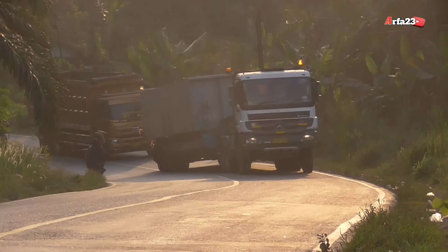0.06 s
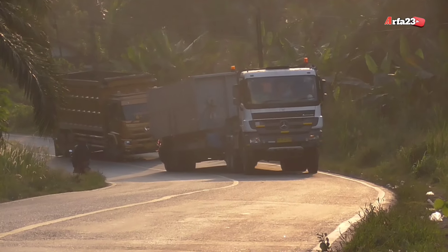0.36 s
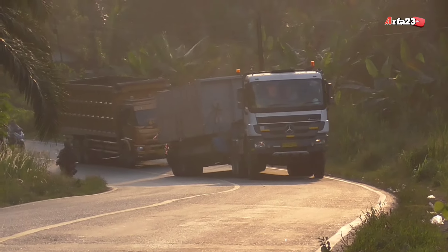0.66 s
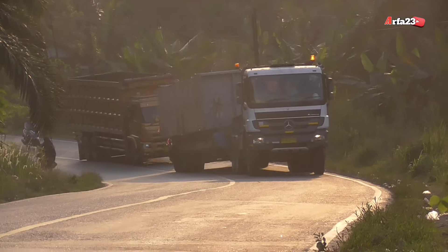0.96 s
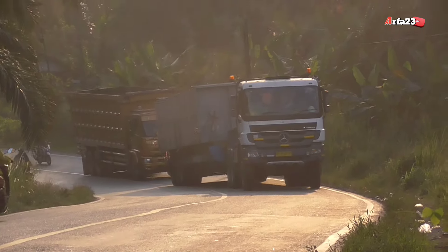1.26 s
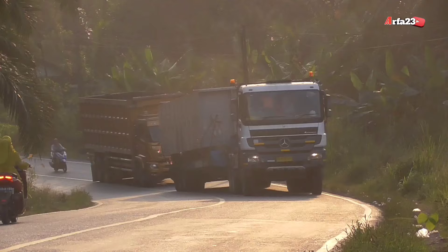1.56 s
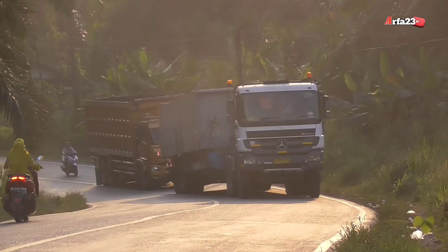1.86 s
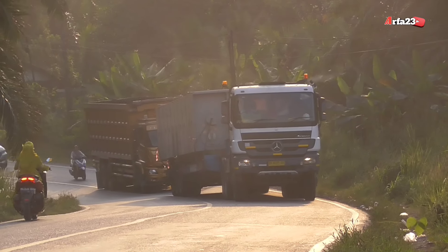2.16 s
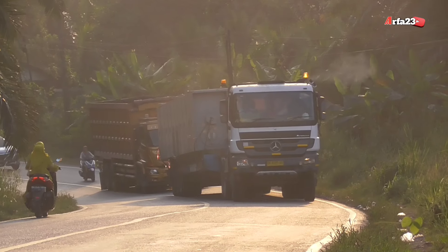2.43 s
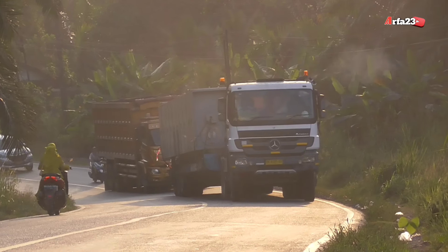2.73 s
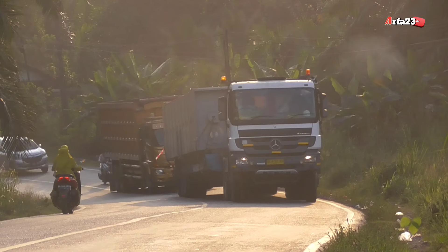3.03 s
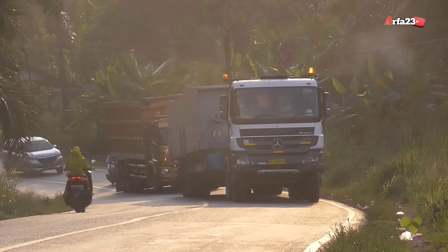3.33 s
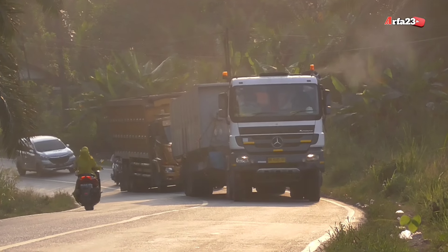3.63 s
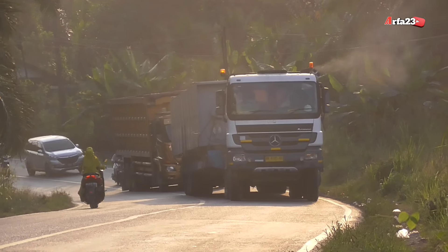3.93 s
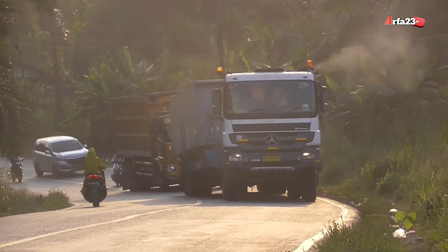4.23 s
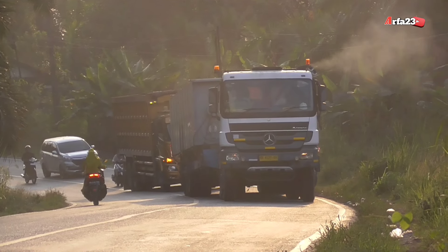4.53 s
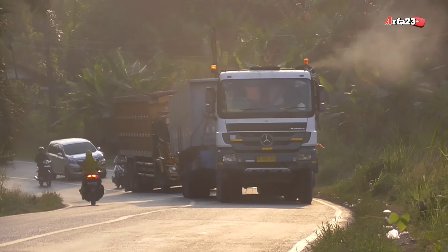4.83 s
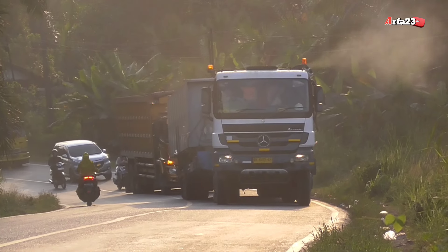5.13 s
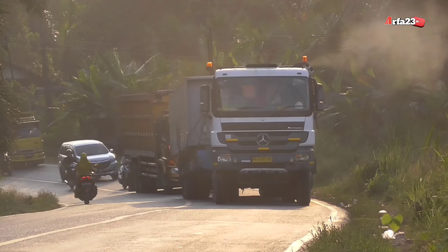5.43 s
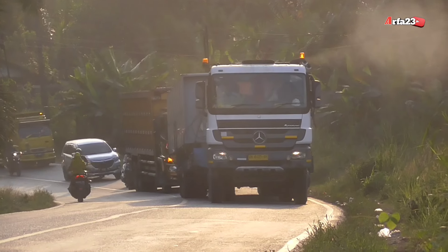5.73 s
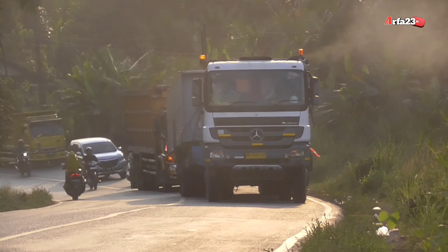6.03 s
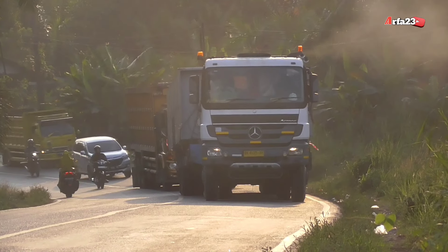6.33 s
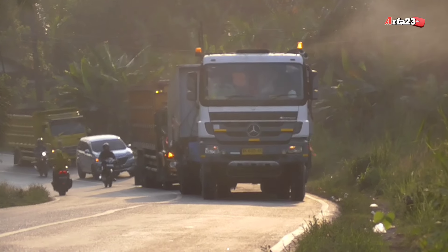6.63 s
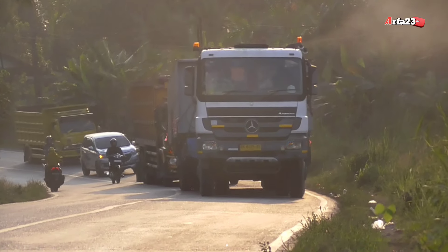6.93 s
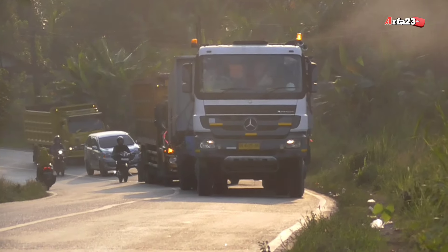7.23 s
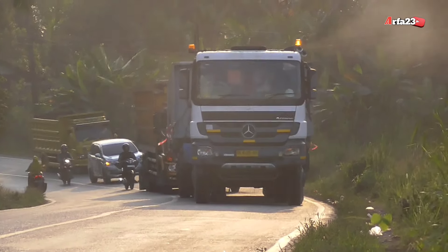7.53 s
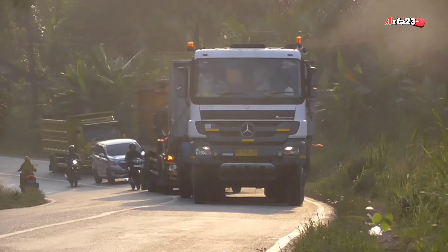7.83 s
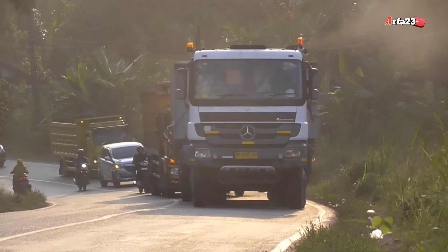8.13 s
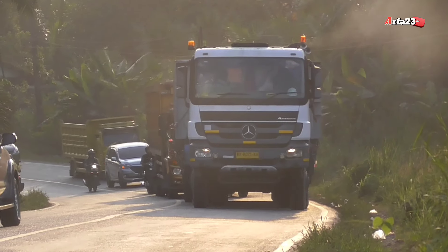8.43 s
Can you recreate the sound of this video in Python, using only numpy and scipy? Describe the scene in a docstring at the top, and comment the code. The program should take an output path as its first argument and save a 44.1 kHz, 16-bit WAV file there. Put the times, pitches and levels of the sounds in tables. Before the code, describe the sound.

A scooter putters away from close by, then traffic rolls past in swells of tyre roar while a heavy diesel truck drones nearer.

```python
"""Traffic on a bend of a country road, heard from the verge.
A single-cylinder scooter putters away from close by, each firing thumping its exhaust, its drive
hissing and ringing. As it fades, a truck lets off a puff of air. Vehicles then roll past in two
swells of tyre roar, body rumble and engine hum, with knocks of loose metal and flicked stones.
Under the second swell the heavy diesel truck drones nearer, its brakes squealing faintly."""
import sys
import numpy as np
from scipy import signal
from scipy.fft import rfft, irfft
from scipy.io import wavfile
from scipy.ndimage import uniform_filter1d

SR = 44100
rng = np.random.default_rng(int(sys.argv[2]) if len(sys.argv) > 2 else 0)


def transcribe(signal):
    """Save signal, clipped to [-1, 1], as a 16-bit WAV file at the path in sys.argv[1]."""
    frames = np.atleast_2d(signal).T
    limited = np.clip(frames, -1, 1)
    pcm = np.round(limited * 32767).astype(np.int16)
    wavfile.write(sys.argv[1], SR, pcm)


N = 383229
T = np.arange(N) / SR
HZ = np.fft.rfftfreq(N, 1 / SR)

# stereo image: how alike the two microphones sound (frequency [Hz], coherence [0-1])
MIC_LIKENESS = [(60, .98), (200, .99), (400, .98), (700, .95), (1300, .87), (2700, .66), (5500, .42),
                (9000, .42), (14000, .42)]
# their balance (frequency [Hz], left minus right [dB])
MIC_BALANCE = [(60, 2.5), (110, -0.2), (200, 0.6), (380, 0.2), (700, 1), (1290, 3.5), (2380, 4),
               (4400, 3.5), (8120, 3.5), (15000, -3)]
# their phase offset (frequency [Hz], left's lead [rad])
MIC_LEAD = [(10, 0), (90, .1), (180, .2), (350, .42), (750, .78), (1400, .75), (2300, 1.05), (4600, 1.25),
            (6500, 1.9), (8500, 2.6), (10000, 4.2), (12500, 4.4), (15200, 6)]

# pass-bys (closest at [s], time to half power [s], rumble [dB], roar [dB], brightness [dB/octave],
# ground-echo notch depth [dB], left minus right [dB], body boom [Hz], notch [Hz])
PASS_BYS = [(0.278, 0.17, -31, -25, 0, 6.5, 0, 230, 473), (.76, 0.17, -38, -34, 27, -14, 22, 380, 486),
            (3.7, 0.44, -27.5, -27, -8.5, -1, -7.5, 302, 560),
            (5.03, 0.37, -21, -17.5, -1.5, -9.5, 6.5, 367, 488),
            (5.95, 0.49, -27.5, -19, -5, 10, -2, 230, 504), (7.03, 0.52, -21, -21.5, 2.5, -14, 6, 272, 472),
            (7.8, 0.63, -25, -24, -4, 14, -3, 192, 460)]
# the dull bed of distant traffic behind them
FAR_ROAR_DB, FAR_BRIGHT_DB_PER_OCTAVE, FAR_SIDE_DB = -44, -43, -23
FAR_NOTCH_DB, FAR_NOTCH_HZ, FAR_BOOM_HZ = -6, 490, 200
# surges of thin, high hiss (start [s], end [s], level [dB], peak [Hz], peak height [dB])
HISS_SURGES = [(1.5, 1.63, -57, 12400, 15), (1.88, 2.0, -61, 12400, 7), (3.13, 3.55, -60.5, 12000, 2),
               (4.08, 4.43, -52, 11800, 0), (4.62, 5.035, -54, 5100, 17), (5.28, 5.816, -54.5, 7260, 15),
               (6.24, 6.417, -54, 13500, 4), (7.05, 7.504, -49.5, 7400, 4), (8.42, 8.69, -54, 11800, 5)]
# their colour (frequency [Hz], level [dB])
SURGE_EQ = [(3000, -19), (4800, 1), (6500, -4.5), (9000, -2), (12200, -2), (15500, -14)]
# rumble of bodies and tyre carcasses (frequency [Hz], level [dB])
RUMBLE_EQ = [(15, -69), (25, -51), (46, -75), (70, -13.5), (97, -9.5), (120, -2.5), (148, 3), (183, -0.5),
             (210, 0.5), (252, -2.5), (311, -1), (480, -19.5), (620, -23), (1060, -120)]
# hiss of grit and air in the treads (time [s], level before trim [dB])
GRIT_LEVEL = [(1.8, -56.5), (3.8, -52.5), (4.35, -45.5), (5.5, -45), (6.5, -45), (7.3, -41.5), (8.69, -45)]
# its colour (frequency [Hz], level [dB])
GRIT_EQ = [(1290, -11), (2200, -4.5), (3030, -8.5), (3960, -5.5), (5000, -9), (6150, -13.5), (7300, -11),
           (9040, -8), (13300, -16), (14600, -23), (15500, -23)]
# flicked stones (time [s], peak level [dB], band centre [Hz])
STONE_TICKS = [(4.6685, -36, 7500), (6.036, -34.5, 6500), (6.4301, -33, 3500)]
# tread roar (frequency [Hz], level [dB])
ROAR_EQ = [(220, -22), (380, -2), (449, -5.5), (862, -1.5), (1070, -6.5), (1300, -8), (1770, -23),
           (2800, -35.5), (3640, -34), (6160, -120)]
# howls in the roar (start [s], end [s], start pitch [Hz], end pitch [Hz], boost [dB], width [octaves])
TREAD_HOWLS = [(.15, 0.383, 664, 700, 6.5, .08), (3.3, 4.1, 1395, 1395, 7, .02),
               (3.7, 3.9, 800, 790, 8, 0.057), (4.622, 4.95, 1380, 1380, 6.5, 0.07),
               (5.22, 5.7, 1250, 1250, 2.5, .05), (5.87, 6.197, 926, 765, 4.5, 0.054),
               (7.52, 8.144, 696, 680, 2.5, 0.079)]

# hum of a far vehicle (time [s], pitch [Hz])
FAR_HUM_PITCH = [(2.7, 238), (2.9, 260), (3.05, 265), (3.2, 256), (3.35, 245)]
# its envelope (time [s], level [dB])
FAR_HUM_LEVEL = [(2.75, -34), (2.88, -26), (3.13, -25.5), (3.3, -34)]
# hum of a near vehicle (time [s], pitch [Hz])
NEAR_HUM_PITCH = [(3.7, 316), (4.2, 316), (4.6, 311), (5, 302), (5.3, 291), (5.7, 281)]
# its envelope (time [s], level [dB])
NEAR_HUM_LEVEL = [(3.85, -33), (4.08, -26), (4.16, -34), (4.25, -26.5), (4.58, -24), (4.78, -31),
                  (4.85, -19), (4.98, -18), (5.2, -21.5), (5.38, -19.5), (5.48, -16), (5.58, -26)]
# falling tread whine (time [s], pitch [Hz])
WHINE_PITCH = [(5.5, 890), (5.85, 865), (6.0, 825), (6.3, 780)]
# its envelope (time [s], level [dB])
WHINE_LEVEL = [(5.55, -31), (5.8, -28.5), (5.93, -30), (6.03, -23.5), (6.1, -27), (6.2, -31)]
# brief hums and whines, pitched before detuning
# (start [s], end [s], start pitch [Hz], end pitch [Hz], level [dB], roughness [ratio])
HUM_ACCENTS = [(3.9, 4.296, 136.5, 134.5, -31, 0.14), (4.993, 5.423, 500.5, 528, -26.5, 0.31),
               (5.305, 5.58, 227, 221, -21.5, .6), (7.1, 7.523, 412, 401.5, -24.5, 0.55),
               (7.254, 7.42, 305, 298, -28, .6), (7.998, 8.65, 1450, 1456, -47, 1)]
# an engine passing in the second swell (time [s], fundamental [Hz])
ENGINE_PITCH = [(6.5, 69.5), (7.2, 68.3), (7.9, 68)]
# its envelope (time [s], level [dB])
ENGINE_LEVEL = [(6.6, -29), (7.1, -22.5), (7.5, -20), (7.9, -28)]
# its partials (multiple of the fundamental, level [dB])
ENGINE_PARTIALS = [(2, -2), (3, 1.5), (4, -9), (5, 1.5), (6, -8)]
# deep engine throb under the traffic (time [s], pitch before detuning [Hz])
THROB_PITCH = [(2.6, 82), (3.4, 76), (4.5, 67), (5.5, 66), (6.8, 64), (7.8, 62)]
# its envelope (time [s], level [dB])
THROB_LEVEL = [(2.55, -40.5), (3.3, -42), (3.9, -52), (4.55, -42), (5.0, -44), (5.6, -55), (6.4, -51),
               (6.8, -40), (7.5, -40), (7.9, -55), (8.6, -44)]

# the truck's puff of compressed air (frequency [Hz], level [dB])
PUFF_EQ = [(1500, -35), (2700, -9), (3500, -2), (4200, -2), (4900, -4), (6000, -12), (8300, -7),
           (12300, -7), (14000, -16), (15500, -20)]
# its brake squeal (time [s], pitch [Hz])
BRAKE_PITCH = [(7.5, 3990), (7.9, 3900), (8.69, 3870)]
# the squeal's envelope (time [s], level [dB])
BRAKE_LEVEL = [(7.51, -50), (7.55, -45), (7.62, -63), (8.0, -65), (8.3, -53), (8.55, -50)]
# blows on its loose metal (time [s], level [dB], hardness [dB/octave])
METAL_BLOWS = [(4.431, -32, 3), (4.4519, -21.5, -6), (4.464, -28, -4), (4.6695, -20, 3), (7.555, -28, -7),
               (8.5456, -38, -11)]
# that metal's modes (frequency [Hz], bandwidth [Hz], level [dB])
METAL_MODES = [(234, 30, -9), (780, 33, -10), (1050, 40, 0), (1130, 30, -1), (1290, 41, -9),
               (1965, 12, -17), (2050, 35, -18), (2220, 40, -15), (2690, 45, -20), (3505, 49, -29),
               (3880, 15, -31), (4759, 25, -33), (7913, 33, -38), (11060, 25, -38)]
# its exhaust drone (time [s], base pitch [Hz])
DIESEL_PITCH = [(5.1, 166), (7, 157.5), (8.69, 153.5)]
# the drone grows as it nears (time [s], level [dB])
DIESEL_LEVEL = [(5.1, -33), (5.9, -32), (6.08, -23), (6.5, -24.5), (6.75, -28), (7.1, -21), (7.7, -24.5),
                (7.95, -19.5), (8.17, -23), (8.3, -19.5), (8.69, -20.5)]
# the drone's partials (multiple of the base pitch, level [dB])
DIESEL_PARTIALS = [(0.98, 0), (4 / 3, -9.5), (3 / 2, -22), (2.36, -15.5)]

# the scooter's engine speed (time [s], firing rate [Hz])
FIRING_RATE = [(0, 27.8), (.25, 28.1), (.5, 27.85), (.65, 27.6), (.85, 27.1), (1.25, 26.9), (1.6, 27.1),
               (2.1, 27.0), (2.6, 27.6), (3.2, 27.9)]
# hiss of its belt drive and valve gear (time [s], level [dB])
DRIVE_LEVEL = [(0, -34.5), (.28, -29.5), (.52, -30), (.98, -42), (1.48, -43), (1.72, -52.5), (2.15, -55)]
# colour of that hiss (frequency [Hz], level [dB])
DRIVE_EQ = [(880, -9.5), (1500, -2), (1750, -12), (2070, -9), (2800, -12), (3680, -10), (4180, -11.5),
            (4700, -6.5), (5890, -19.5), (6690, -10), (7230, -11.5), (8700, -8.5), (11300, -14),
            (11800, -14), (15500, -22.5)]
# the drive swings left as it goes by (time [s], left minus right [dB])
DRIVE_PAN = [(0, -1.5), (.42, 2.5), (.95, -1), (1.5, -0.5)]
# its metal tones (pitch before Doppler [Hz], level [dB], loudest at [s], time to half strength [s])
DRIVE_TONES = [(4603, -48.5, .38, .15), (6869, -49, .36, .2), (7612, -52, .45, .2), (8500, -46.5, .33, .22),
               (9005, -49, .42, .2), (9205, -51, .15, .15), (11106, -42, .2, .2), (11090, -48.5, .72, .15)]
# its breathy whistle (frequency [Hz], level [dB])
WHISTLE_EQ = [(3900, -35), (4400, -2), (4900, -1), (5500, -15), (6150, 2), (6520, 0), (6950, -18),
              (7700, -16), (8050, -1), (8500, -35)]
# the exhaust as it rides off (time [s], level [dB])
EXHAUST_LEVEL = [(0, -23), (.3, -21.5), (.7, -20.5), (1.05, -20), (1.35, -19), (1.65, -23), (2.1, -25.5),
                 (2.55, -27), (3.2, -34)]
# close by, the pipe barks (multiple of the firing rate, level [dB])
BARK_EQ = [(1, -50), (2, -13), (3, -13), (4, -4), (5, -3), (6, 1), (7, -7), (8, -3), (9, -2.5), (10, -4.5),
           (11, -6), (12, -10), (13, -9.5), (14, -17), (15, -20), (16, -22)]
# further off, the silencer booms (multiple of the firing rate, level [dB])
BOOM_EQ = [(1, -45), (2, -16), (3, -12), (4, -7.5), (5, -1), (6, 1.5), (7, -9), (8, -12), (9, -20),
           (10, -9.5), (11, -12), (12, -12), (13, -17), (14, -23), (15, -23), (16, -26), (17, -22),
           (18, -24)]
# the tailpipe's ring (time [s], level [dB])
PIPE_RING_LEVEL = [(0, -47), (.35, -38), (.6, -40.5), (.82, -33), (1.05, -32), (1.2, -39), (1.4, -34),
                   (1.7, -57), (3.2, -60)]


def gain_of(db):
    """Decibels to gain."""
    return 10 ** (np.asarray(db) / 20)


def unit_rms(x):
    """Scales to rms 1."""
    return x / np.sqrt(np.mean(x ** 2) + 1e-20)


def spectrum(points, hz):
    """Joins points by straight lines on a log-frequency axis."""
    f, value = np.transpose(points)
    return np.interp(np.log(hz + 1), np.log(f + 1), value)


def curve(points, t=T):
    """Joins points by straight lines in time."""
    return np.interp(t, *np.transpose(points))


def gate(start_s, end_s, fade_s, t=T):
    """1 from start to end, with a fade on either side."""
    return np.interp(t, [start_s - fade_s, start_s, end_s, end_s + fade_s], [0, 1, 1, 0])


def bell(hz, centre_hz, octaves):
    """A bump of height 1 on a log-frequency axis."""
    return np.exp(-.5 * (np.log2((hz + 1) / centre_hz) / octaves) ** 2)


def tilt(db_per_octave, hz, pivot_hz):
    """A tilt EQ in dB, levelling off an octave and a half either side of the pivot."""
    return db_per_octave * np.clip(np.log2((hz + 1) / pivot_hz), -1.5, 1.5)


def wander(rate_hz):
    """Random modulation of rms 1, rolled off above rate_hz."""
    return unit_rms(irfft(rfft(rng.standard_normal(N)) / (1 + (HZ / rate_hz) ** 4), N))


def rush(eq, patchy_db, shape_db=lambda t, hz: 0):
    """Two unrelated noises of steady power, their colour moved by shape_db and by random patches."""
    t, hz = np.arange(N // 256 + 5) * 256 / SR, np.fft.rfftfreq(1024, 1 / SR)
    grid = (len(t), len(hz))
    patches = unit_rms(uniform_filter1d(uniform_filter1d(rng.standard_normal(grid), 9, 0), 7, 1))
    gains = gain_of(shape_db(t[:, None], hz) + patchy_db * patches)
    gains /= np.sqrt(np.average(gains ** 2, axis=1, weights=gain_of(spectrum(eq, hz)) ** 2))[:, None]
    noise = rng.standard_normal((2, *grid)) + 1j * rng.standard_normal((2, *grid))
    moving = signal.istft((noise * gains).swapaxes(1, 2), nperseg=1024, noverlap=768)[1][:, :N]
    return unit_rms(irfft(rfft(moving) * gain_of(spectrum(eq, HZ)), N))


def drone(pitch, level, partials, rough, shake_hz, fade_s):
    """Partials on one pitch curve, each shaken in phase and strength."""
    phase = 2 * np.pi * np.cumsum(curve(pitch)) / SR
    tone = sum(gain_of(db) * np.sin(k * phase + rough * wander(shake_hz))
               * (1 + rough * wander(shake_hz)) for k, db in partials)
    return unit_rms(tone) * gain_of(curve(level)) * gate(level[0][0], level[-1][0], fade_s)


def mic_pair(pair):
    """Two unrelated sounds become a partly alike left and right; their mean keeps its level."""
    a, b = rfft(pair)
    likeness = np.clip(spectrum(MIC_LIKENESS, HZ), 0, 1)
    right_gain = gain_of(-spectrum(MIC_BALANCE, HZ))
    shared = right_gain * likeness * np.exp(-1j * spectrum(MIC_LEAD, HZ))
    own = right_gain * np.sqrt(1 - likeness ** 2)
    return irfft(np.array([a, shared * a + own * b]) * 2 / np.sqrt(abs(1 + shared) ** 2 + own ** 2), N)


def pan(pair, side_db):
    """Pans by level difference, positive to the left."""
    return pair * gain_of(side_db * np.array([[1 / 3], [-2 / 3]]))


def traffic(t):
    """Each vehicle's power falls with distance squared; the loudest lends the mix its colour and side."""
    closest_s, half_s, rumble_db, roar_db, *traits = np.transpose(PASS_BYS)
    nearness = 1 / (1 + ((t[..., None] - closest_s) / half_s) ** 2)
    power, far_power = nearness * gain_of(roar_db) ** 2, gain_of(FAR_ROAR_DB) ** 2
    total = power.sum(-1) + far_power
    distant = dict(bright=FAR_BRIGHT_DB_PER_OCTAVE, notch_db=FAR_NOTCH_DB, side_db=FAR_SIDE_DB,
                   boom_hz=FAR_BOOM_HZ, notch_hz=FAR_NOTCH_HZ)
    mix = {name: (power @ trait + far_power * distant[name]) / total
           for name, trait in zip(distant, traits)}
    mix["rumble_db"] = 10 * np.log10(nearness @ gain_of(rumble_db) ** 2)
    mix["roar_db"] = 10 * np.log10(total)
    return mix


def hiss_surges():
    """A thin, high hiss surges now and then, each time with its own peak."""
    def shape_db(t, hz):
        peak_hz = curve([(s, f) for start, end, _, f, _ in HISS_SURGES for s in (start, end)], t)
        peak_db = curve([(s, db) for start, end, _, _, db in HISS_SURGES for s in (start, end)], t)
        return peak_db * bell(hz, peak_hz, octaves=.24)
    envelope = sum(gain_of(db) * gate(start, end, fade_s=.092) for start, end, db, *_ in HISS_SURGES)
    return rush(SURGE_EQ, patchy_db=2, shape_db=shape_db) * envelope


def grit_hiss(trim_db=3, grain_db=.47, flutter_db=.5):
    """Fine grit and air squeezed from the treads."""
    noise = rush(GRIT_EQ, patchy_db=1.5, shape_db=lambda t, hz: tilt(-3.5, hz, pivot_hz=4000))
    return noise * gain_of(curve(GRIT_LEVEL) + trim_db + grain_db * wander(500) + flutter_db * wander(6))


def stones(rise_s=.003, decay_s=.016, width_octaves=.8):
    """Short soft ticks of stones flicked against the underbody."""
    out, t, hz = np.zeros((2, N)), np.arange(4096) / SR, np.fft.rfftfreq(4096, 1 / SR)
    envelope = np.exp(-t / decay_s) * (1 - np.exp(-t / rise_s))
    for s, db, centre_hz in STONE_TICKS:
        band = 1 / (1 + (np.log2((hz + 1) / centre_hz) / width_octaves) ** 4)
        tick = irfft(rfft(rng.standard_normal((2, len(t)))) * band) * envelope
        start = round(s * SR)
        out[:, start:start + len(t)] += gain_of(db) * tick / abs(tick).max()
    return out


def body_rumble(trim_db=3.5, boom_db=4):
    """Bodies and tyre carcasses boom on the uneven road, each vehicle at its own pitch."""
    def shape_db(t, hz):
        return tilt(.5, hz, pivot_hz=150) + boom_db * bell(hz, traffic(t)["boom_hz"], octaves=.42)
    return rush(RUMBLE_EQ, patchy_db=1, shape_db=shape_db) * gain_of(traffic(T)["rumble_db"] + trim_db)


def low_engines(throb_detune=.98):
    """A rough engine passes in the second swell; a deep throb sits under the traffic."""
    passing = drone(ENGINE_PITCH, ENGINE_LEVEL, ENGINE_PARTIALS, rough=.91, shake_hz=13.6, fade_s=.12)
    throb = drone(THROB_PITCH, THROB_LEVEL, [(throb_detune, 0)], rough=.27, shake_hz=7.2, fade_s=.17)
    return passing + throb


def passing_hums():
    """A far engine hums, then a near one, then a tread whine falls as it passes."""
    far = drone(FAR_HUM_PITCH, FAR_HUM_LEVEL, [(1, 0)], rough=.32, shake_hz=16, fade_s=.15)
    near = drone(NEAR_HUM_PITCH, NEAR_HUM_LEVEL, [(1, 0), (2, -26)], rough=.16, shake_hz=25, fade_s=.08)
    whine = drone(WHINE_PITCH, WHINE_LEVEL, [(1, 0)], rough=.4, shake_hz=24, fade_s=.21)
    return far + near + whine


def brief_hums(detune=.99):
    """Engine and tread tones that stand out for a moment and glide a little."""
    return sum(drone([(start, from_hz), (end, to_hz)], [(start, db), (end, db)], [(detune, 0)],
                     rough, shake_hz=20, fade_s=.1)
               for start, end, from_hz, to_hz, db, rough in HUM_ACCENTS)


def truck_air_puff(start_s=2.157, rise_s=.095, level_db=-45.5, fade_db_per_s=55):
    """The truck vents compressed air with a short tss."""
    attack = np.clip((T - start_s) / rise_s, 0, 1)
    release_db = fade_db_per_s * np.maximum(T - start_s - rise_s, 0)
    return rush(PUFF_EQ, patchy_db=1) * attack * gain_of(level_db - release_db)


def brake_squeal():
    """A faint, ragged squeal of brakes that sags in pitch."""
    return drone(BRAKE_PITCH, BRAKE_LEVEL, [(1, 0)], rough=1.3, shake_hz=60, fade_s=.05)


def truck_clanks():
    """Loose metal knocks as the truck body rocks; a hard blow rings the high modes, a soft one thuds."""
    out, t = np.zeros(N), np.arange(SR // 5) / SR
    for s, blow_db, hardness in METAL_BLOWS:
        ring = sum(gain_of(blow_db + db + hardness * np.log2(hz / 2000))
                   * np.exp(-np.pi * width_hz * t) * np.sin(2 * np.pi * hz * t)
                   for hz, width_hz, db in METAL_MODES)
        slot = out[round(s * SR):][:len(t)]
        slot += ring[:len(slot)]
    return out


def truck_exhaust():
    """The diesel's drone sinks in pitch and grows as the truck crawls nearer."""
    return drone(DIESEL_PITCH, DIESEL_LEVEL, DIESEL_PARTIALS, rough=.24, shake_hz=8, fade_s=.27)


def tread_howls(t, hz, fade_s=.13):
    """Boost in dB of narrow tread resonances that swell out of the roar, some gliding."""
    return sum(boost_db * gate(start, end, fade_s, t)
               * bell(hz, np.interp(t, [start, end], [from_hz, to_hz]), octaves)
               for start, end, from_hz, to_hz, boost_db, octaves in TREAD_HOWLS)


def tyre_roar(cycles, throb=.1, lumpy_db=.59, near_db=-21, crest_db=3, dip_db=5):
    """Tread blocks roar, coloured by the echo off the ground; the scooter's share throbs."""
    def shape_db(t, hz):
        mix = traffic(t)
        ground_notch = mix["notch_db"] * bell(hz, mix["notch_hz"], octaves=.2)  # negative depth boosts
        # a crest and a second dip come in when all vehicles are far
        farness = np.clip((near_db - mix["roar_db"]) / 10, 0, 1)
        far_eq = crest_db * bell(hz, 830, octaves=.025) - dip_db * bell(hz, 1060, octaves=.19)
        return tread_howls(t, hz) + tilt(mix["bright"], hz, 840) - ground_notch + farness * far_eq
    beat = 1 + throb * np.interp(T, [.6, 2.2], [1, 0]) * np.cos(2 * np.pi * (cycles - .1))
    noise = rush(ROAR_EQ, patchy_db=.34, shape_db=shape_db)
    return noise * beat * gain_of(traffic(T)["roar_db"] + lumpy_db * wander(14))


def scooter_drive(cycles, throb=.11, grain_db=1.5, flutter_db=1, ring_width_hz=30, flicker_db=2):
    """Belt and valve gear hiss in time with the engine; metal tones swell and sink as it turns away."""
    beat = 1 + throb * np.cos(2 * np.pi * (cycles - .15))
    beat *= gain_of(grain_db * wander(290) + flutter_db * wander(26))
    sizzle = rush(DRIVE_EQ, patchy_db=2) * unit_rms(beat)
    sizzle *= gain_of(curve(DRIVE_LEVEL)) * gate(DRIVE_LEVEL[0][0], DRIVE_LEVEL[-1][0], fade_s=.25)
    doppler_time = np.cumsum(np.interp(T, [.45, .95], [1, .945])) / SR
    tones = sum(gain_of(db) / (1 + ((T - s) / half_s) ** 2) * np.cos(2 * np.pi * hz * doppler_time)
                * np.array([wander(ring_width_hz), wander(ring_width_hz)])
                for hz, db, s, half_s in DRIVE_TONES)
    return sizzle + np.sqrt(2) * beat * tones * gain_of(flicker_db * wander(14))


def drive_whistle(level_db=-46.5):
    """The scooter's drive whistles breathily once it has passed."""
    return rush(WHISTLE_EQ, patchy_db=3) * gain_of(level_db) * gate(.49, 1.2, fade_s=.32)


def gas_chuff(firings, level_db=-17, decay_s=.005):
    """A chuff of turbulent gas makes each firing a little different."""
    t = T[:SR // 10]
    envelope = signal.oaconvolve(firings, t * np.exp(-t / decay_s))[:N]
    turbulence = irfft(rfft(rng.standard_normal(N)) * bell(HZ, 230, octaves=.7), N)
    return unit_rms(turbulence * envelope) * gain_of(level_db)


def exhaust_thumps(firings, eq, rolloff_db_per_octave=30, max_cut_db=70):
    """Each firing sends out a pressure pulse of the given colour."""
    multiple = np.fft.rfftfreq(8192, 1 / SR) / np.median(curve(FIRING_RATE))
    k, db = np.transpose(eq)
    octaves_above = np.log2(np.maximum(multiple / k[-1], 1))
    colour_db = np.interp(multiple, k, db) - np.minimum(rolloff_db_per_octave * octaves_above, max_cut_db)
    # minimum phase packs the energy into the attack
    cepstrum = irfft(np.log(gain_of(colour_db)))
    cepstrum[1:4096] *= 2
    cepstrum[4097:] = 0
    pulse = irfft(np.exp(rfft(cepstrum)))
    return unit_rms(signal.oaconvolve(firings, pulse)[:N])


def pipe_echoes(x, direct=.92, round_trip_s=.0125):
    """Part of each pulse runs up and down the pipe, filling the gaps without changing the colour."""
    delay = np.exp(-2j * np.pi * HZ * round_trip_s)
    return irfft(rfft(x) * (direct + delay) / (1 + direct * delay), N)


def scooter_exhaust(cycles, steady_until_s=1.3, pipe_hz=412, pipe_decay_s=.03):
    """Firings thump and ring the pipe; the bark turns to a boom, then fades and grows uneven."""
    unevenness = .06 + .17 * np.clip(T - steady_until_s, 0, 1)
    firings = np.diff(np.floor(cycles), prepend=0) * (1 + unevenness * rng.standard_normal(N))
    bark = pipe_echoes(exhaust_thumps(firings, BARK_EQ))
    boom = exhaust_thumps(firings, BOOM_EQ)
    away = np.interp(T, [.5, 1.05], [0, 1])
    putter = (1 - away) * bark + away * boom + gas_chuff(firings)
    t = T[:SR // 5]
    ping = np.exp(-t / pipe_decay_s) * np.sin(2 * np.pi * pipe_hz * t)
    ring = unit_rms(signal.oaconvolve(firings, ping)[:N])
    return putter * gain_of(curve(EXHAUST_LEVEL)) + ring * gain_of(curve(PIPE_RING_LEVEL))


def scene(grit_pan_share=.18):
    """The stereo mix: the scooter leaves, the traffic rolls past, the truck draws near."""
    cycles = np.cumsum(curve(FIRING_RATE)) / SR + .87  # the scooter fires at each whole number
    side_db = traffic(T)["side_db"]
    tyres = pan(mic_pair(tyre_roar(cycles)), side_db)
    grit = pan(mic_pair(grit_hiss() + stones()), grit_pan_share * side_db)
    drive = pan(mic_pair(scooter_drive(cycles) + drive_whistle()), curve(DRIVE_PAN))
    mono = (scooter_exhaust(cycles) + passing_hums() + truck_exhaust() + low_engines()
            + brake_squeal() + brief_hums() + truck_clanks())
    point_sources = np.array([mono, np.zeros(N)])  # one signal reaches both microphones
    return tyres + grit + drive + mic_pair(point_sources + body_rumble() + truck_air_puff() + hiss_surges())


def record(dry, low_cut_hz=46, high_cut_hz=15500):
    """A low cut against wind and a steep band limit on top."""
    trimmed = signal.sosfilt(signal.butter(5, low_cut_hz, "high", fs=SR, output="sos"), dry)
    high_cut = signal.firwin(511, high_cut_hz, window=("kaiser", 9), fs=SR)
    return signal.oaconvolve(trimmed, high_cut[None], "same")


dry = scene()
out = record(dry)
transcribe(out)
```